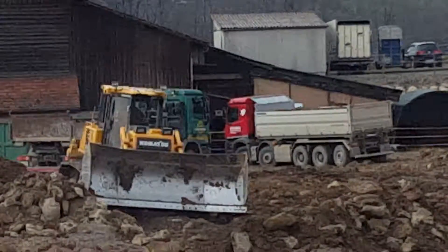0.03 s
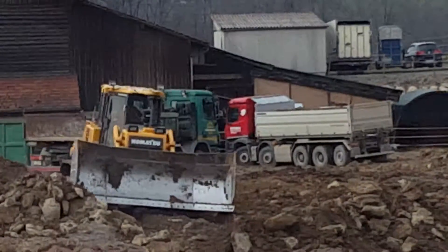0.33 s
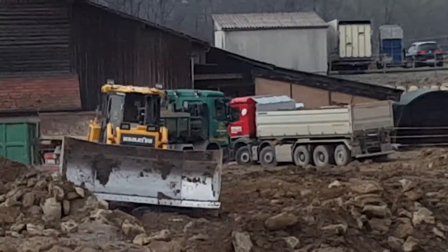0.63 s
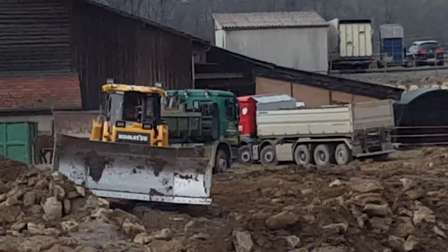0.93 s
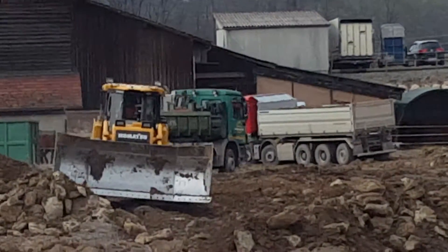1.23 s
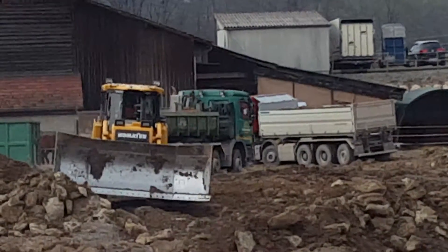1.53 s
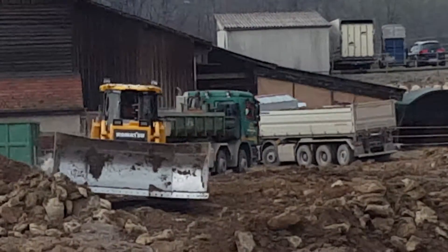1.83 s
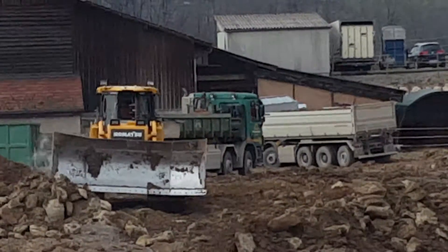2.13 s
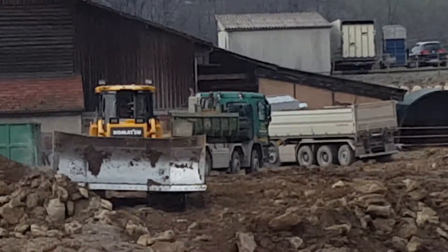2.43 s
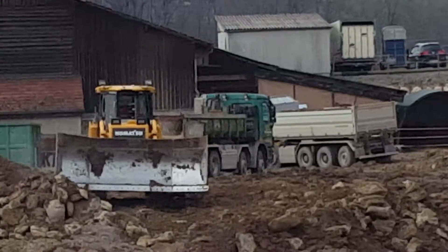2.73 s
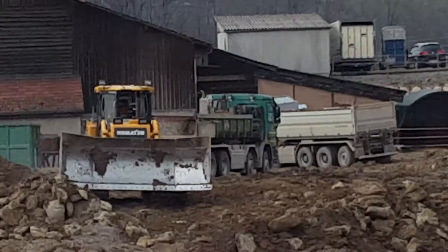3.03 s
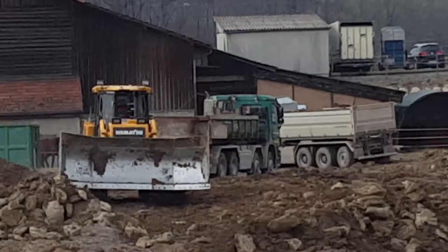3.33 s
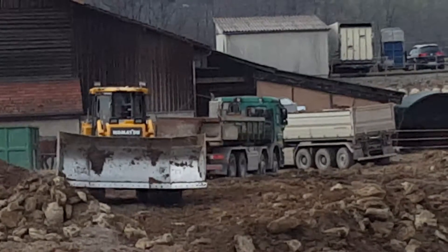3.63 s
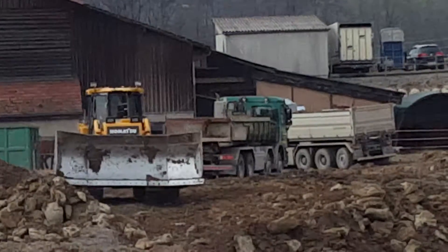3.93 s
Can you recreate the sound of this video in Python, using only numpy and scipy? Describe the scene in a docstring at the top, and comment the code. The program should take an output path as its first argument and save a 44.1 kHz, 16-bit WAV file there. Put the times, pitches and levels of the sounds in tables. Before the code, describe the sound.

A bulldozer's diesel engine drones steadily while its steel tracks rattle and knock over rubble.

```python
"""Bulldozer creeping over rubble

A diesel drones at near-steady speed: firing harmonics over puffing exhaust turbulence.
The running gear rattles the steel body, rollers ring and gears whine. Track links knock,
steel clatters on rubble, grit scrapes, stones click and dry pins squeak faintly.
The treble lies mostly on the left; faint yard noise and hiss fill both sides."""
import sys
import numpy as np
from scipy import signal
from scipy.fft import rfft, irfft
from scipy.io import wavfile

SR = 44100
rng = np.random.default_rng(int(sys.argv[2]) if len(sys.argv) > 2 else 0)


def store_wav(level_fs):
    """Save 16-bit WAV to argv[1]."""
    pcm = np.round(np.clip(np.atleast_2d(level_fs), -1, 1) * 32767)
    wavfile.write(sys.argv[1], SR, pcm.T.astype(np.int16))


N = 176400
T = np.arange(N) / SR
HZ = np.fft.rfftfreq(N, 1 / SR)


def amp(db):
    """Decibels to gain."""
    return 10 ** (np.asarray(db) / 20)


def unit(x):
    """Scale to rms 1."""
    return x / np.sqrt(np.mean(x ** 2) + 1e-20)


def spectrum(points):
    """Interpolate a table over log frequency."""
    hz, value = np.transpose(points)
    return np.interp(np.log(HZ + 1), np.log(hz + 1), value)


def curve(points):
    """Interpolate a table over time."""
    return np.interp(T, *np.transpose(points))


def colour(x, density_db):
    """Shape white sound of rms 1 to a spectrum in dB per Hz."""
    return irfft(rfft(x) * amp(density_db), N) * np.sqrt(SR / 2)


def wander(rate_hz):
    """Random drift of rms 1, low-passed at rate_hz."""
    return unit(irfft(rfft(rng.standard_normal(N)) / np.sqrt(1 + (HZ / rate_hz) ** 8), N))


def blow(start_s, level_db, rise_s, decay_s):
    """Impact envelope: linear rise, exponential fall."""
    age = np.maximum(T - start_s, 0)
    return amp(level_db) * np.minimum(age / rise_s, 1) * np.exp(-np.maximum(age - rise_s, 0) / decay_s)


def ring(centre_hz, width_hz):
    """Noise in one steep resonance, 0 dB per Hz at the peak."""
    return colour(rng.standard_normal(N), -20 * np.log10(1 + ((HZ - centre_hz) / width_hz) ** 2))


# Engine speed: time_s, cycle_rate_hz
ENGINE_SPEED = [(0, 20.3), (.3, 21), (.9, 19.8), (1.15, 20.16), (2.3, 18.95), (2.7, 20.02), (3.3, 19.8),
                (4, 19.6)]
# Exhaust tones: cycle_multiple, level_db
EXHAUST_ORDERS = [(1, -49.5), (2, -40.5), (3, -57), (4, -34.8), (5, -44.5), (6, -48), (7, -52.5),
                  (8, -34.8), (9, -46.5), (10, -53), (15, -61)]
# Exhaust turbulence: freq_hz, density_db
EXHAUST_SPECTRUM = [(10, -88), (30, -75), (55, -67.5), (72, -62), (92, -56.5), (115, -62.5), (145, -62),
                    (170, -56.5), (195, -55.5), (218, -64.5), (260, -66), (310, -71), (450, -77.5),
                    (900, -100), (3000, -150)]
# Exhaust level: time_s, firing_gain_db, turbulence_gain_db
EXHAUST_GAIN = [(0, -0.5, 0.5), (.3, -0.5, 3), (.8, 1, 2.5), (1.15, -.5, -2), (1.6, -.5, 0), (2.3, -1, 1),
                (2.55, 1.3, -.5), (2.8, 0, 1.5), (2.95, -0.5, -.5), (3.2, 0, 1), (3.5, -2.9, 3),
                (4, 1, -3.5)]


def engine(firings_per_cycle=4, waver_hz=6, puff_depth=.25):
    """Firing harmonics in step, weaker lines from uneven cylinders, a turbulent puff per firing."""
    cycle_phase = 2 * np.pi * np.cumsum(curve(ENGINE_SPEED)) / SR
    firing_gain = amp(curve([(s, db) for s, db, _ in EXHAUST_GAIN]))
    turbulence_gain = amp(curve([(s, db) for s, _, db in EXHAUST_GAIN]))
    tones = np.zeros(N)
    for order, level_db in EXHAUST_ORDERS:
        is_firing = order % firings_per_cycle == 0
        phase = order * cycle_phase + (rng.uniform(0, 2 * np.pi) if order % 2 else np.pi)
        waver = .13 if is_firing else .2 * min(order / firings_per_cycle, 1) ** 2
        line = (1 + waver * wander(waver_hz)) * np.cos(phase)
        line += waver * wander(waver_hz) * np.sin(phase)
        tones += amp(level_db) * np.sqrt(2) * line * (firing_gain if is_firing else 1)
    puffs = unit(rng.standard_normal(N) * (1 + puff_depth * np.cos(firings_per_cycle * cycle_phase)))
    return tones + turbulence_gain * colour(puffs, spectrum(EXHAUST_SPECTRUM))


# Steel body resonances: centre_hz, width_hz, lift_db
BODY_MODES = [(748, 80, 4.5), (1858, 115, 7), (2268, 115, 11), (2566, 90, 8.5), (2940, 80, 7),
              (4445, 110, 6.5), (5270, 110, 6.5), (5857, 80, 4.5)]


def body_lift_db():
    """Resonant peaks of the steel body."""
    return sum(db / (1 + (2 * (HZ - hz) / width_hz) ** 2) for hz, width_hz, db in BODY_MODES)


# Running gear rattle: freq_hz, density_db
RATTLE_SPECTRUM = [(100, -93), (300, -73), (430, -76), (540, -75.5), (660, -73.5), (850, -76.5),
                   (1100, -76), (1500, -78.5), (2080, -89.5), (2750, -96.5), (3300, -94.5), (3620, -108),
                   (6400, -110), (7300, -120), (11000, -130)]
# Rattle level: time_s, gain_db
RATTLE_GAIN = [(0, 1.5), (.55, 1.5), (.8, 0), (1.1, 0), (1.5, -0.6), (1.87, 0.4), (2.3, 0.5), (3, -0.36),
               (3.5, 0), (4, -1)]


def running_gear(grains_per_s=1800, spread_db=1.5, grain_share=.22, flutter_db=.83):
    """Dense small impacts and fluttering friction ring the steel body."""
    sizes = amp(spread_db * np.minimum(rng.exponential(1, N), 4))
    grains = unit(sizes * rng.choice([-1, 1], N) * (rng.random(N) < grains_per_s / SR))
    drive = np.sqrt(grain_share) * grains + np.sqrt(1 - grain_share) * rng.standard_normal(N)
    gain = amp(curve(RATTLE_GAIN) + flutter_db * wander(rate_hz=22.2))
    return colour(drive * gain, spectrum(RATTLE_SPECTRUM) + body_lift_db())


# Track link knocks: start_s, level_db
LINK_KNOCKS = [(.312, -3), (.485, -7.5), (0.564, 0), (1.085, -3), (1.644, -9), (1.818, -4), (1.94, -8),
               (2.009, -16), (2.091, -8), (2.183, -1.5), (2.336, -6), (2.701, 1), (2.786, -2), (2.888, -4),
               (3.168, 1), (3.37, -3.5), (3.736, -4)]
# Knock thud: freq_hz, density_db
THUD_SPECTRUM = [(120, -76.5), (250, -57.5), (430, -71.5), (600, -67), (720, -59), (900, -72), (1500, -76),
                 (2500, -94), (7000, -135)]
# Track shoe modes: pitch_hz, level_db, decay_s
SHOE_MODES = [(701, -45.5, .024), (743, -42, 0.016)]


def track_knocks(rise_s=.0016):
    """Links thud and briefly ring a track shoe."""
    envelope, rings = np.zeros((2, N))
    for start_s, level_db in LINK_KNOCKS:
        envelope += blow(start_s, level_db, rise_s, decay_s=.017)
        for pitch_hz, mode_db, decay_s in SHOE_MODES:
            mode = np.sin(2 * np.pi * pitch_hz * (T - start_s))
            rings += blow(start_s, level_db + mode_db, rise_s, decay_s) * mode
    return rings + colour(rng.standard_normal(N) * envelope, spectrum(THUD_SPECTRUM))


# Steel hitting rubble: start_s, level_db, decay_s
CLATTER_HITS = [(0.197, -7, 0.02), (.302, -8.5, .03), (.324, -10.5, 0.041), (.354, -1, 0.034),
                (0.389, -10, 0.02), (.635, -13, 0.017), (0.901, -9.5, 0.017), (1.086, -10.5, 0.02),
                (3.654, -8, 0.018), (3.841, -6.5, 0.013)]
# Clatter: freq_hz, density_db
CLATTER_SPECTRUM = [(150, -78.5), (400, -68), (800, -65), (1300, -62), (1550, -65.5), (2100, -76),
                    (2800, -81.5), (3300, -82.5), (3800, -94), (6400, -104), (8000, -118), (12000, -130)]


def clatter(rise_s=.0032):
    """Steel strikes rubble; bright bursts ring the body."""
    envelope = sum(blow(start_s, db, rise_s, decay_s) for start_s, db, decay_s in CLATTER_HITS)
    return colour(rng.standard_normal(N) * envelope, spectrum(CLATTER_SPECTRUM) + body_lift_db())


# Track roller ring: time_s, density_db
ROLLER_LEVEL = [(0, -74), (.5, -76.5), (.85, -67.5), (1.3, -71), (1.55, -67), (2.05, -70), (2.55, -69.5),
                (2.95, -74.5), (3.4, -76), (4, -71.5)]


def rollers(throb_hz=10.8, throb_depth=.45):
    """Ringing rollers throb as the links pass."""
    throb = 1 + throb_depth * np.sin(2 * np.pi * (throb_hz * T + rng.random()))
    return amp(curve(ROLLER_LEVEL)) * throb * ring(centre_hz=740, width_hz=55)


# Gear whine: time_s, density_db
WHINE_LEVEL = [(0, -74), (.6, -75.5), (1.1, -82.5), (1.5, -81.5), (1.85, -76), (2.3, -84.5), (4, -78.5)]


def gear_whine():
    """Gears whine in a narrow, fuzzy noise band."""
    return amp(curve(WHINE_LEVEL)) * ring(centre_hz=1850, width_hz=67)


# Stone clicks: start_s, level_db
STONE_HITS = [(.204, 2), (.362, -2.5), (.535, -9), (.843, -4), (2.076, -6), (2.379, -7.5), (2.675, -5),
              (2.77, -4), (2.93, -6)]
# Click: freq_hz, density_db
STONE_SPECTRUM = [(1000, -115), (3000, -102), (4200, -99), (6400, -99), (7800, -108), (10500, -108),
                  (15000, -122)]


def stone_clicks():
    """Stones click in thin bursts of treble noise."""
    envelope = sum(blow(start_s, db, rise_s=.003, decay_s=.02) for start_s, db in STONE_HITS)
    return colour(rng.standard_normal(N) * envelope, spectrum(STONE_SPECTRUM))


# Track pin squeaks: start_s, length_s, from_hz, to_hz, level_db
PIN_SQUEAKS = [(.755, .18, 4146, 4146, -69), (.48, .125, 6530, 6630, -72.5), (.97, .12, 7450, 7720, -79),
               (1.56, .09, 7580, 7540, -82), (2.55, .16, 5750, 6350, -80), (3.3, .3, 8550, 8900, -86),
               (3.84, .14, 8900, 8600, -82)]


def pin_squeaks(jitter_depth=.0035, shake_db=4.5):
    """Dry track pins squeak in thin, unsteady glides that swell and fade."""
    jitter = 1 + jitter_depth * wander(rate_hz=149)
    shake = amp(shake_db * wander(rate_hz=35))
    tones = np.zeros(N)
    for start_s, length_s, from_hz, to_hz, level_db in PIN_SQUEAKS:
        progress = np.clip((T - start_s) / length_s, 0, 1)
        pitch_hz = (from_hz + (to_hz - from_hz) * progress) * jitter
        tones += amp(level_db) * np.sin(np.pi * progress) * np.sin(2 * np.pi * np.cumsum(pitch_hz) / SR)
    return tones * shake


# Grit level: time_s, gain_db
GRIT_GAIN = [(0, -7), (.6, -5.5), (1.2, -2), (2.1, -5), (2.5, -4), (2.8, 1), (3.2, -0.5), (3.6, -7),
             (4, -19.5)]
# Grit scrape: freq_hz, density_db
GRIT_SPECTRUM = [(1000, -135), (3500, -112), (5000, -111), (6400, -108), (7400, -117), (9000, -121),
                 (15000, -135)]


def grit(flicker_db=3.5):
    """Grit scrapes under the tracks in flickering bursts."""
    bursts = amp(curve(GRIT_GAIN)) * unit(amp(flicker_db * wander(rate_hz=30)))
    return colour(bursts * rng.standard_normal(N), spectrum(GRIT_SPECTRUM))


# Background noise: freq_hz, density_db
YARD_SPECTRUM = [(15, -85), (35, -71), (100, -72), (250, -78.5), (500, -88.5), (900, -95.5), (1600, -106.5),
                 (3000, -109.3), (6500, -118.3), (10500, -119.7), (13000, -117.6), (15600, -112.8)]


def yard_noise():
    """Distant yard noise and microphone hiss, independent on each side."""
    return colour(rng.standard_normal((2, N)), spectrum(YARD_SPECTRUM))


# Right level against left: freq_hz, gain_db
RIGHT_GAIN = [(40, -1.5), (80, -3.5), (160, -3), (250, -10.5), (400, -9.5), (600, -15), (760, -14),
              (1200, -23), (1800, -31), (2600, -22), (4000, -18.5), (9000, -12)]
# Right phase behind left: freq_hz, lag_rad
RIGHT_LAG = [(20, 0), (45, .1), (80, .25), (160, .45), (340, 1.0), (700, 1.6), (1300, 2.2), (3000, 2.0)]


def scene(fade_s=.006):
    """The bulldozer reaches the right side later and much duller, over the yard noise."""
    left = engine() + running_gear() + rollers() + gear_whine() + grit()
    left += track_knocks() + clatter() + stone_clicks() + pin_squeaks()
    edge_s = np.minimum(T, T[::-1])
    left *= np.sin(np.pi / 2 * np.minimum(edge_s / fade_s, 1)) ** 2
    right_response = amp(spectrum(RIGHT_GAIN)) * np.exp(-1j * spectrum(RIGHT_LAG))
    right = irfft(rfft(left) * right_response, N)
    return np.array([left, right]) + yard_noise()


def record(dry):
    """Steep low-pass band limit."""
    cutoff_hz = 15720
    lowpass = signal.firwin(801, cutoff_hz, window=("kaiser", 9), fs=SR)
    return signal.oaconvolve(dry, lowpass[None], "same")


dry = scene()
out = record(dry)
store_wav(out)
```